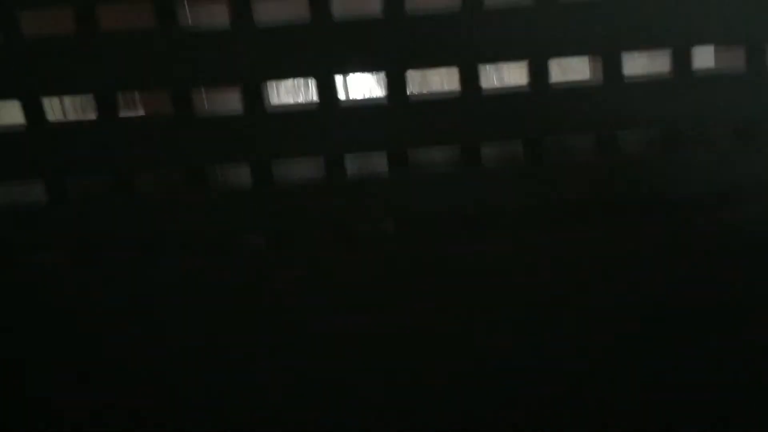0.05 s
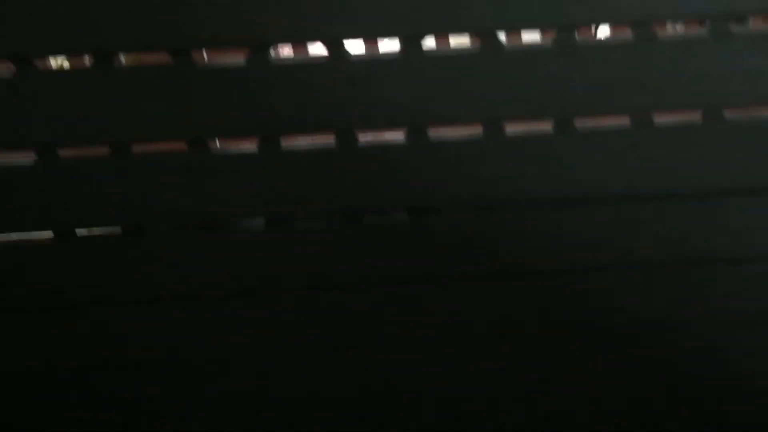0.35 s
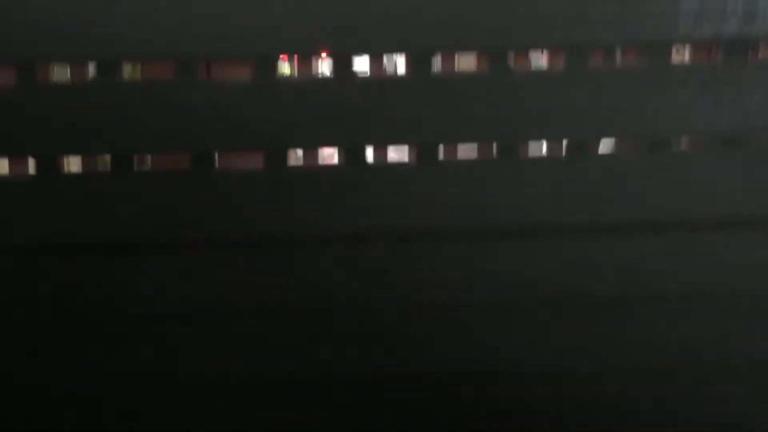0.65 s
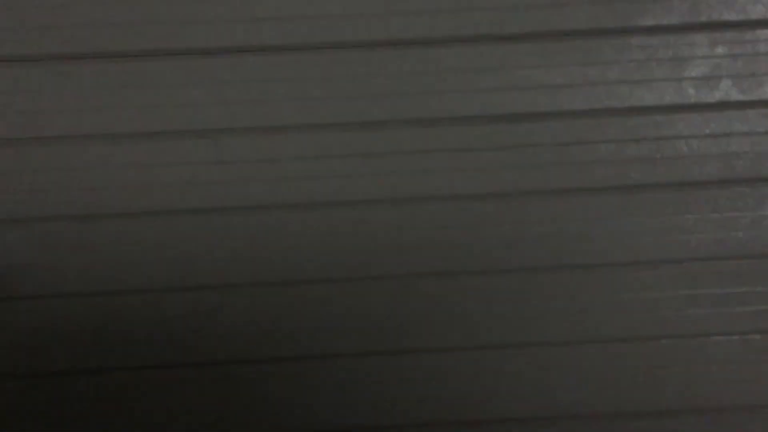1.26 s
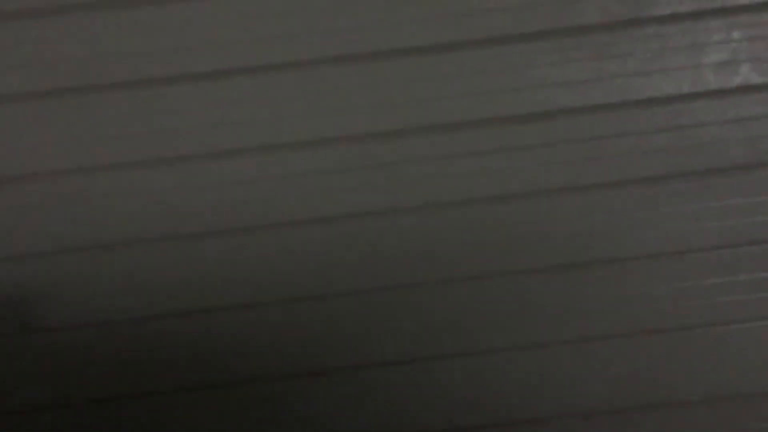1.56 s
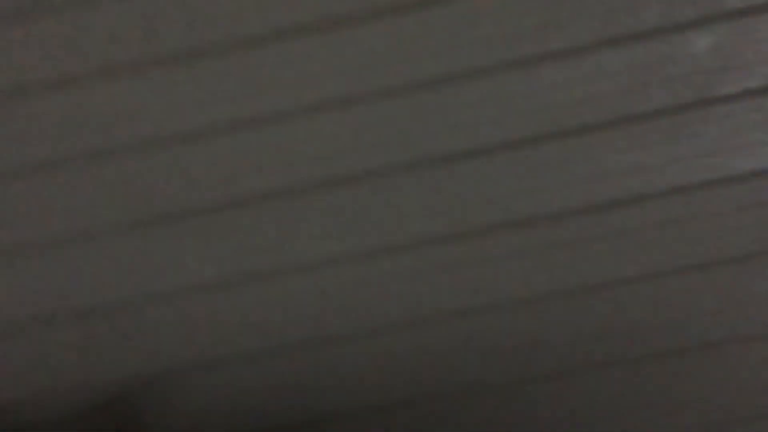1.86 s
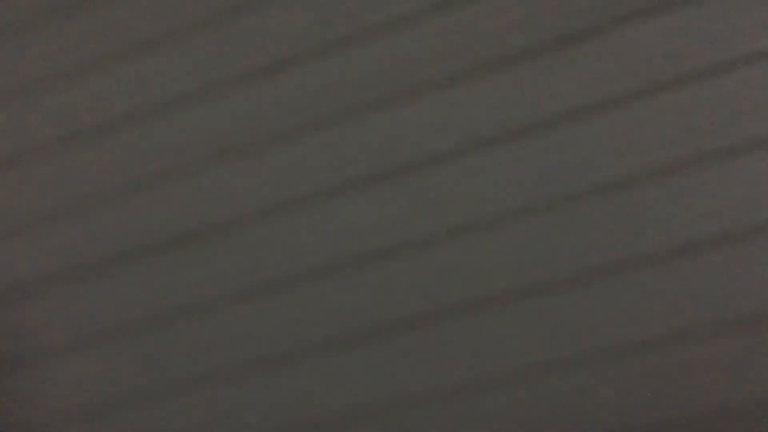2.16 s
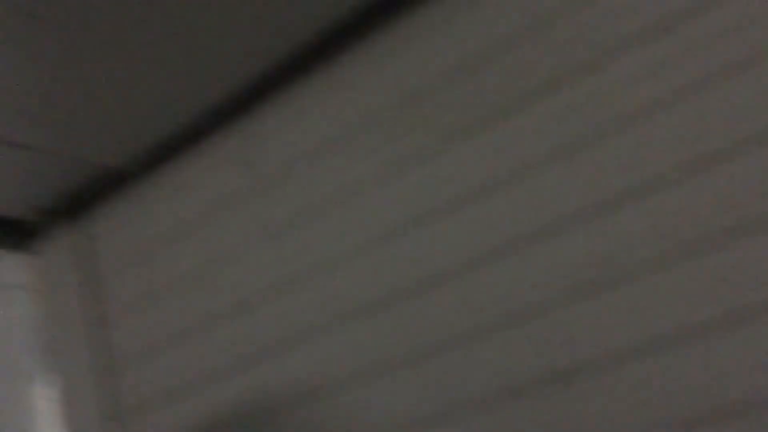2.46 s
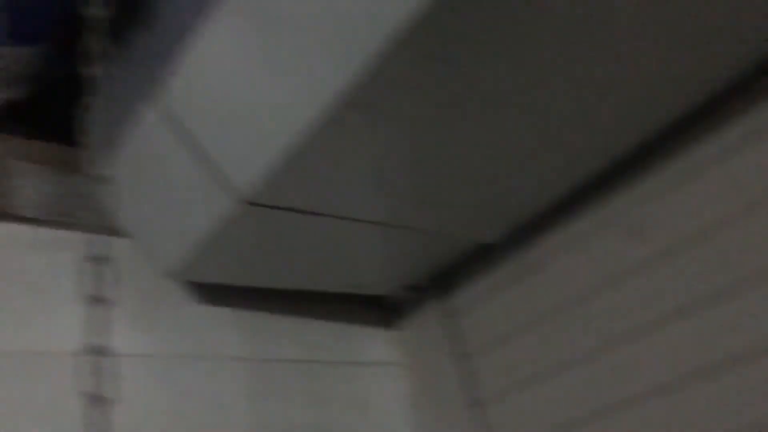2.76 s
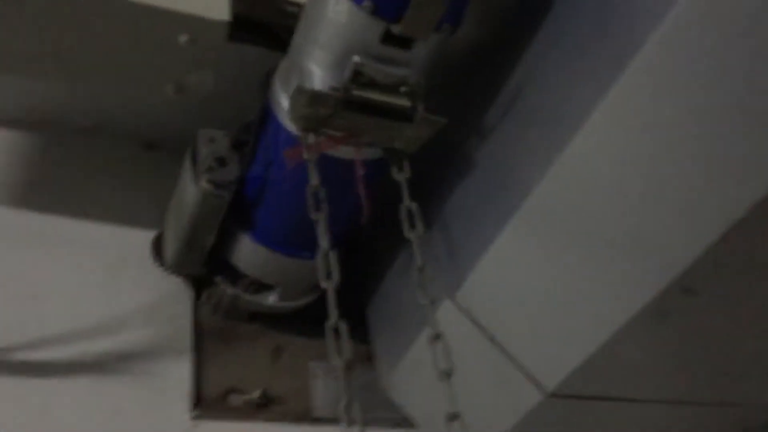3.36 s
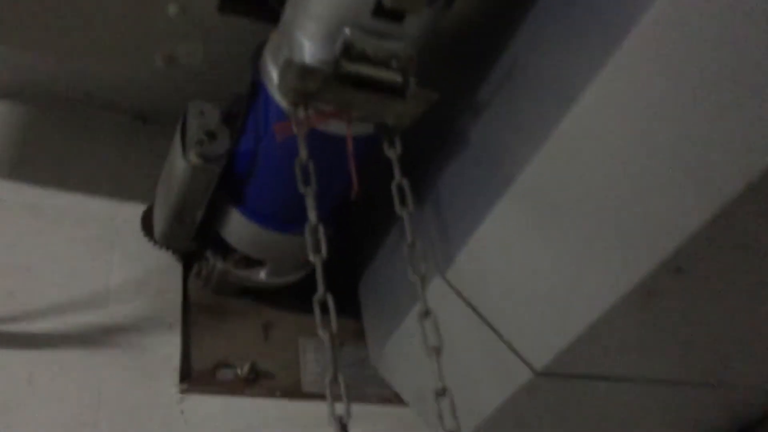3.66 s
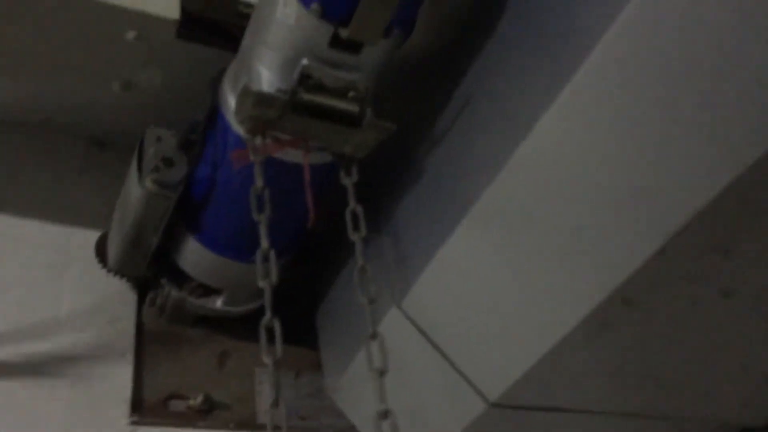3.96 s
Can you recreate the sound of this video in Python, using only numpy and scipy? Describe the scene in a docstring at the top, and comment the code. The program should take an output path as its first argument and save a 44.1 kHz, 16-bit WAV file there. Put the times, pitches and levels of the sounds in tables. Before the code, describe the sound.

A motorised steel roller shutter comes down close by in a small, echoing room. The drive drones while the slats knock and scrape, then the shutter lands with a brief squeak, a rattle and a loud clunk.

```python
"""A motor lowers a steel roller shutter, close by in a small room with hard walls.
From the start the drive drones, and the slats knock as they leave the drum and scrape in their rails.
At about 2.4 s a chain jingles. From 3.24 s the shutter lands: a squeak, a rattle of slats closing up,
then a loud clunk of the bottom bar. At 3.52 s the motor clicks off and the room's echo dies away."""
import sys
import numpy as np
from scipy import signal
from scipy.fft import rfft, irfft
from scipy.io import wavfile
from scipy.ndimage import uniform_filter1d

SR = 44100
rng = np.random.default_rng(int(sys.argv[2]) if len(sys.argv) > 2 else 0)


def put_to_file(sound):
    """Save the sound as 16-bit audio at rate SR, in the file named by the first command-line argument."""
    columns = np.atleast_2d(sound).T  # one column per channel
    safe = np.clip(columns, -1, 1)
    whole_steps = np.round(safe * 32767)
    wavfile.write(sys.argv[1], SR, whole_steps.astype(np.int16))


N = 176400
T = np.arange(N) / SR

# slats knocking (time [s], relative level [dB], brightness [dB per octave], rattle length [s])
SLAT_KNOCKS = [(.052, -29, -3.5, 0.016), (.162, -26, 0.5, 0.0019), (.170, -16.5, 2.5, 0.0086),
               (.381, -20, 1, 0.015), (.486, -22, 0, 0.025), (.741, -27, -3.5, 0.014),
               (.826, -22.5, 1.5, 0.017), (.933, -29, -0.5, 0.0091), (.957, -23, -0.5, 0.011),
               (1.071, -23.5, -0.5, 0.01), (1.154, -19, 0.5, .014), (1.187, -24.5, 1, 0.016),
               (1.298, -22.5, -1.5, 0.0075), (1.406, -22, -0.5, 0.0062), (1.482, -23.5, 1, 0.024),
               (1.632, -27, 1.5, 0.01), (1.712, -27, -2.5, 0.021), (1.825, -20, -1, 0.012),
               (1.898, -23, 3, 0.0084), (1.940, -19, 2.5, 0.0092), (2.029, -26.5, -3, 0.023),
               (2.152, -24, 2.5, 0.0048), (2.161, -14, 1.5, 0.0068), (2.281, -24.5, -4.5, 0.0087),
               (2.372, -28.5, 0, 0.02), (2.407, -23.5, -1, 0.015), (2.508, -27, 0, 0.019),
               (2.618, -23, -1.5, 0.028), (2.724, -26, -3, 0.018), (2.830, -22.5, -1.5, 0.029),
               (2.954, -27.5, -4, 0.01), (2.976, -22.5, -4, 0.014), (3.074, -26, -1, 0.0049)]
# tone of a knocked slat (pitch [Hz], level [dB])
SLAT_TONE = [(60, -16), (700, -5.5), (1200, 0.5), (2400, -0.5), (3100, -6), (4100, -6), (5000, -15),
             (7400, -28.5), (9500, -30.5), (16000, -49)]
# slats closing up on landing (time [s], relative level [dB], brightness [dB per octave], length [s])
CLOSING_KNOCKS = [(3.264, -17.5, -1.5, 0.025), (3.286, -17.5, 1, 0.035)]
def knocks(rows):
    """Loose slats hit and rattle; a longer rattle starts more softly and fades more slowly."""
    out = np.zeros(N)
    crisp_s = .017  # shorter rattles start at once
    for start, db, tilt, length in rows:
        body = patchy(SLAT_TONE, spread_db=3.5)
        attack = .48 * max(length - crisp_s, .002)
        rattle = burst(body, attack, hold=.81 * length, decay=.009 + .89 * length, tilt=tilt, grain_db=1)
        add(out, start, undb(db - 1) * rattle)
        hardness = min(crisp_s / length, 1) ** 2
        first_hit = burst(body, decay=.0015, tilt=tilt)
        add(out, start, undb(db + 4) * hardness * first_hit)
    return out


# hard hits of steel on steel (time [s], level [dB], pitch struck most strongly [Hz])
SLAT_CLANKS = [(0.173, -14, 3900), (0.171, -21.5, 5900), (0.829, -22.5, 3520), (1.299, -16, 2470),
               (1.899, -15, 2710), (1.939, -19, 3850), (2.161, -14, 1930), (2.163, -15.5, 4870),
               (3.127, -21.5, 1456)]
# notes a slat rings at (pitch [Hz], level [dB])
SLAT_NOTES = [(1540, 3.5), (1740, -1.5), (2277, -0.5), (2520, 2.5), (2750, 0), (3790, 9.5), (4010, 1.5),
              (5330, -2), (5790, -4.5), (6570, -6)]
def clanks():
    """A hard hit rings a slat's notes near one pitch; each slat is tuned a little differently."""
    out, notes = np.zeros(N), np.array(SLAT_NOTES)
    for start, db, hz in SLAT_CLANKS:
        tuning = 1 + .02 * rng.uniform(-.8, 1)
        octaves_away = np.log2(notes[:, :1] / hz)
        weights = np.exp(-(octaves_away / .32) ** 2)
        add(out, start, undb(db) * ring(notes * [tuning, 1], fade_s=.05, weights=weights))
    return out


# blows of the bottom bar (time [s], level [dB], length [s])
BAR_BLOWS = [(3.3135, -9, 0.0085), (3.329, -7.5, 0.0064)]
# tone of a blow (pitch [Hz], level [dB])
BAR_TONE = [(40, -22.5), (250, -9), (470, -1.5), (950, 1.5), (1250, 0.5), (1700, -18), (16000, -59.5)]
def bar_clunk():
    """The bottom bar lands with a double blow."""
    out = np.zeros(N)
    for start, db, length in BAR_BLOWS:
        add(out, start, undb(db) * burst(BAR_TONE, attack=.00048, hold=length, decay=.011))
    return out


# notes the bottom bar rings at (pitch [Hz], level [dB])
BAR_NOTES = [(480, 2.5), (540, 4.5), (608, -2.5), (900, 1), (1108, 1), (1190, -6.5)]
def bar_ring():
    """The bar rings on quietly after its first blow."""
    out = np.zeros(N)
    add(out, BAR_BLOWS[0][0], undb(-26) * ring(BAR_NOTES, fade_s=.65))
    return out


# clashes of steel (time [s], level [dB], length [s])
LOCK_CLASHES = [(3.3172, -13.5, 0.0081), (3.326, -9.5, 0.012)]
# tone of a clash (pitch [Hz], level [dB])
CLASH_TONE = [(800, -5.5), (2000, -3), (4300, 5), (9000, -2), (10600, -8), (13500, 4.5), (16000, -7.5)]
def clash():
    """Steel clashes brightly as the shutter locks."""
    out = np.zeros(N)
    for start, db, length in LOCK_CLASHES:
        hit = burst(CLASH_TONE, attack=.0011, hold=length, decay=length, grain_db=.5)
        add(out, start, undb(db) * hit)
    return out


# notes of the squeak (pitch [Hz], level [dB])
SQUEAK_NOTES = [(1330, -23), (1490, -33.5)]
def squeak():
    """The landing shutter squeaks: quick tiny slips make the pitch and loudness shake."""
    out = np.zeros(N)
    start, length, slips_per_s = 3.244, .041, 700
    swell = np.minimum(T / .006, 1) * np.exp(-np.maximum(T - length, 0) / .008)
    for hz, db in SQUEAK_NOTES:
        rough_note = tone(hz, wander=.04, rate=slips_per_s) * undb(4 * wobble(slips_per_s))
        add(out, start, undb(db) * swell * unit(rough_note))
    return out


# rubbing in the rails (time [s], relative scrape level [dB], relative hiss level [dB])
RAIL_LEVELS = [(0, -33, -49), (.72, -36.5, -54), (1.0, -31, -53), (1.85, -29, -43), (2.12, -38.5, -50),
               (2.52, -36.5, -41.5), (2.8, -34.5, -56.5), (3.18, -32.5, -50), (3.52, -38, -53)]
# tone of the scrape (pitch [Hz], level [dB])
SCRAPE_TONE = [(100, -9), (300, -12), (700, -5), (1100, 4.5), (2300, -2.5), (4000, -14), (5800, -38),
               (16000, -65.5)]
# tone of the hiss (pitch [Hz], level [dB])
HISS_TONE = [(3000, -12.5), (5500, 6), (7500, -7.5), (9400, -0.5), (10400, -10.5), (16000, -11.5)]
def rails():
    """The ends of the slats scrape and hiss as they slide down the rails."""
    scrape = unit(colour(grit(N, grain_db=.5), SCRAPE_TONE))
    scrape *= undb(curve(RAIL_LEVELS, column=1) + .76 * wobble(30))
    hiss = unit(colour(grit(N, grain_db=3.5), HISS_TONE))
    hiss *= undb(curve(RAIL_LEVELS, column=2) + 1.3 * wobble(27))
    return undb(-2.5) * (scrape + hiss)


# loudness of the drive (time [s], rumble level [dB], boom level [dB])
DRIVE_LEVELS = [(0, -40.5, -53.5), (.58, -43, -52), (1.1, -43, -39), (1.4, -40.5, -59.5),
                (1.75, -37.5, -36), (2.1, -41.5, -60), (2.95, -36.5, -45.5), (3.5, -41, -43.5)]
# tone of the drum's rumble (pitch [Hz], level [dB])
RUMBLE_TONE = [(25, -30), (50, 2.5), (130, 1.5), (320, 1), (700, -9.5), (16000, -89)]
# notes of the motor and gears (pitch [Hz], level [dB])
MOTOR_NOTES = [(298, -52.5), (1389, -49.5)]
def drive():
    """The drum rumbles, the whole shutter booms, and the motor and gears hum."""
    rumble = unit(colour(rng.standard_normal(N), RUMBLE_TONE))
    rumble *= undb(curve(DRIVE_LEVELS, column=1) + 1.3 * wobble(16))
    boom = tone(hz=69.8, wander=.008, rate=8.1)
    boom *= undb(curve(DRIVE_LEVELS, column=2) + .74 * wobble(28))
    hum = sum(tone(hz, wander=.0089, rate=34.77) * undb(db + 3 * wobble(16)) for hz, db in MOTOR_NOTES)
    return rumble + boom + hum


# thin ticks of the hinges, and at 3.294 s a soft first clash of steel as the shutter lands (time [s], level
# [dB])
THIN_TICKS = [(0.169, -31), (0.825, -45), (1.154, -38), (1.759, -37), (1.939, -39), (2.161, -28),
              (2.407, -42.5), (3.294, -27.5)]
# tone of a tick (pitch [Hz], level [dB])
TICK_TONE = [(2000, -31), (5000, 2.5), (8900, 7.5), (16000, -4)]
def ticks():
    """The joints between the slats tick, and a soft first clash of steel comes as the shutter lands."""
    out = np.zeros(N)
    for start, db in THIN_TICKS:
        add(out, start, undb(db) * burst(TICK_TONE, attack=.00025, hold=.0024, decay=.014, grain_db=3.5))
    return out


# clicks of the motor's switch (time [s], level [dB])
SWITCH_CLICKS = [(3.524, -29), (3.529, -30)]
# tone of a click (pitch [Hz], level [dB])
CLICK_TONE = [(1500, -16), (6000, 11), (16000, 0)]
def switch():
    """The switch clicks twice as the motor cuts out."""
    out = np.zeros(N)
    for start, db in SWITCH_CLICKS:
        add(out, start, undb(db) * burst(CLICK_TONE, attack=.00022, hold=.00038, decay=.00085))
    return out


# jingles of the chain (time [s], typical level [dB], length [s])
CHAIN_JINGLES = [(2.399, -40, .012), (2.455, -39, .075), (2.618, -38.5, .004)]
# tone of one link (pitch [Hz], level [dB])
LINK_TONE = [(7800, -16), (9000, 12.5), (10500, -7), (13300, -1), (16000, -10.5)]
def chain():
    """The hanging chain jingles: link after link clinks at uneven gaps."""
    out, gap_s = np.zeros(N), .01
    for start, db, length in CHAIN_JINGLES:
        for lag in np.arange(0, length, gap_s):
            late, strength = rng.random(2)
            clink = burst(patchy(LINK_TONE, spread_db=6), decay=.0052)
            add(out, start + lag + late * gap_s / 2, undb(db) * (.5 + strength) * clink)
    return out


# tone of the low background (pitch [Hz], level [dB])
BACKGROUND_TONE = [(20, -36), (50, -1.5), (100, -11.5), (170, -21.5), (16000, -80.5)]
def background():
    """A faint, deep noise lies under everything."""
    return undb(-49.5) * unit(colour(rng.standard_normal(N), BACKGROUND_TONE))


# how long the room echoes (pitch [Hz], time to fade by 60 dB [s])
ECHO_TIMES = [(400, 0.7), (1100, 0.79), (3500, 0.78), (8000, 0.66), (16000, 0.33)]
def in_room(x, echo_db):
    """A sound plus its echo off the hard walls; the highest pitches fade first."""
    t, tail = T[:SR], np.zeros(SR)
    noise, hz = rfft(rng.standard_normal(SR)), np.arange(SR // 2 + 1)
    edges = np.append(0, np.geomspace(100, SR / 2, 16))
    for low, high in zip(edges, edges[1:]):
        band = irfft(noise * ((hz >= low) & (hz < high)))
        tail += band * np.exp(-np.log(1000) * t / at_hz(ECHO_TIMES, (low + high) / 2))
    tail *= 1 - np.exp(-t / .001)  # the echo builds up quickly
    echo = signal.fftconvolve(x, tail / np.sqrt(np.sum(tail ** 2)))[:N]
    return x + undb(echo_db) * echo


def burst(points, attack=1 / SR, hold=0, *, decay, tilt=0, grain_db=0):
    """One noisy hit in the tone of the struck part; attack, hold and decay are in seconds."""
    t = T[:2 ** 13]
    shape = np.minimum(t / attack, 1) * np.exp(-np.maximum(t - hold, 0) / decay)
    phases = np.angle(rfft(shape * grit(len(t), grain_db)))
    even = irfft(np.exp(1j * phases)) * shape ** .25  # all pitches about equally strong
    return unit(colour(even, points, tilt)) * np.sqrt(np.mean(shape ** 2))


def ring(notes, fade_s, weights=1):
    """Pure notes that start together and fade by 60 dB in fade_s."""
    hz, db = np.array(notes).T[:, :, None]
    gain = undb(db) * weights
    phase = 2 * np.pi * (hz * T[:SR] + rng.random(hz.shape))
    fade = np.minimum(T[:SR] / .00038, 1) * np.exp(-np.log(1000) * T[:SR] / fade_s)
    return (gain * np.sin(phase)).sum(0) * fade / np.sqrt(np.sum(gain ** 2) / 2)


def tone(hz, wander, rate):
    """A note whose pitch wanders."""
    pitch = hz * (1 + wander * wobble(rate))
    return np.sqrt(2) * np.sin(2 * np.pi * np.cumsum(pitch) / SR)


def wobble(rate):
    """A smooth random wobble of size about 1, changing rate times a second."""
    steps = rng.standard_normal(N // 40)
    line = np.interp(T * rate, np.arange(len(steps)), steps)
    return unit(uniform_filter1d(line, int(SR / rate)))


def grit(size, grain_db):
    """Noise of many tiny touches; more grain_db makes them more uneven."""
    strength = undb(grain_db * np.minimum(rng.exponential(size=size // 20 + 1), 4))
    return unit(rng.standard_normal(size) * np.repeat(strength, 20)[:size])


def patchy(points, spread_db):
    """Add random bumps to a tone: each struck part favours its own pitches."""
    hz = np.geomspace(40, 16000, 96)
    return np.column_stack([hz, at_hz(points, hz) + spread_db * rng.standard_normal(len(hz))])


def colour(x, points, tilt=0):
    """Give a sound the tone in a table, brightened by tilt dB per octave."""
    n = len(x)
    hz = np.arange(n // 2 + 1) * SR / n
    db = at_hz(points, hz) + tilt * np.log2(np.maximum(hz, 500) / 1000)
    folded = irfft(np.log(undb(db)), n)
    folded[1:n // 2] *= 2
    folded[n // 2 + 1:] = 0  # so the filter rings only after a hit, never before
    return irfft(rfft(x) * np.exp(rfft(folded)), n)


def at_hz(points, hz):
    """Look up a table's value at a pitch."""
    rows = np.array(points)
    return np.interp(np.log(hz + 1), np.log(rows[:, 0]), rows[:, 1])


def curve(table, column):
    """Join one column's values into a line over time."""
    rows = np.array(table)
    return np.interp(T, rows[:, 0], rows[:, column])


def add(out, start, x):
    """Mix a sound in at a time in seconds."""
    i = int(start * SR)
    out[i:i + len(x)] += x[:N - i]


def undb(db):
    """Turn decibels into a number to multiply by."""
    return 10 ** (np.asarray(db) / 20)


def unit(x):
    """Scale to an average power of 1."""
    return x / np.sqrt(np.mean(x ** 2))


def scene():
    """The shutter runs down and lands; each group of sounds reaches the walls by its own path."""
    motor_off_s, run_down_s = 3.523, .0082
    running = np.exp(-np.maximum(T - motor_off_s, 0) / run_down_s)
    moving = (knocks(SLAT_KNOCKS), ticks() + chain(), running * rails())
    out = sum(in_room(part, echo_db=-4.5) for part in moving)
    out += in_room(clanks(), echo_db=-7)
    landing = (knocks(CLOSING_KNOCKS) + squeak(), bar_clunk(), clash())
    out += sum(in_room(part, echo_db=-9.5) for part in landing)
    return (out + bar_ring() + background() + running * drive() + switch())[None]


def record(dry):
    """Thin the deepest bass, round off the loudest peaks and cut the very highest pitches."""
    bass_hz, ceiling, top_hz = 36, .95, 15850
    thinned = signal.sosfilt(signal.butter(4, bass_hz, "high", fs=SR, output="sos"), dry)
    rounded = ceiling * np.tanh(thinned / ceiling)
    return signal.sosfilt(signal.ellip(10, .2, 70, top_hz, fs=SR, output="sos"), rounded)


dry = scene()
out = record(dry)
put_to_file(out)
```